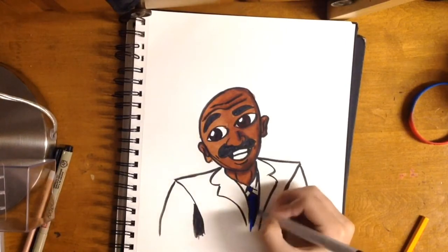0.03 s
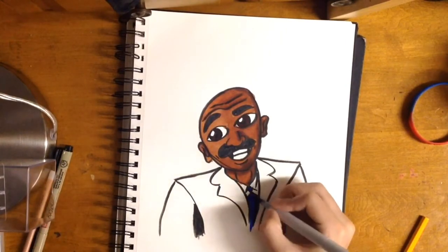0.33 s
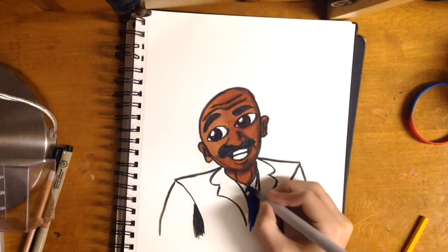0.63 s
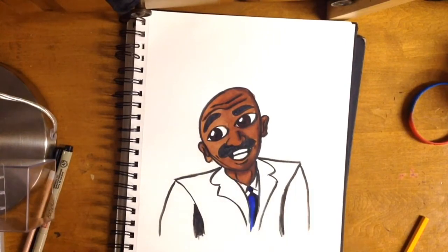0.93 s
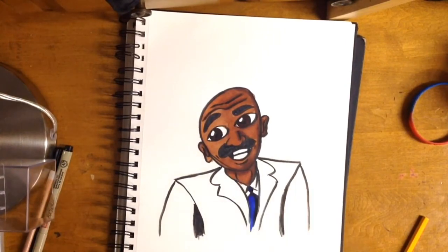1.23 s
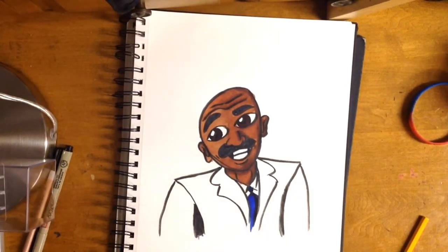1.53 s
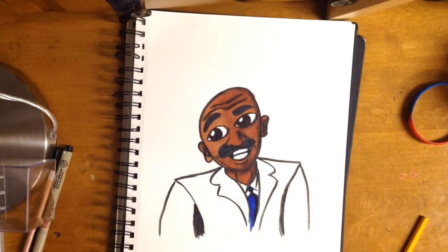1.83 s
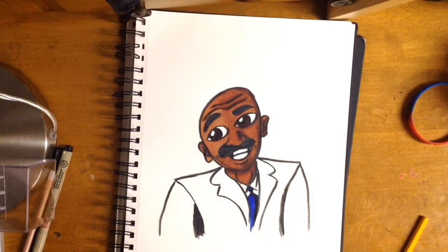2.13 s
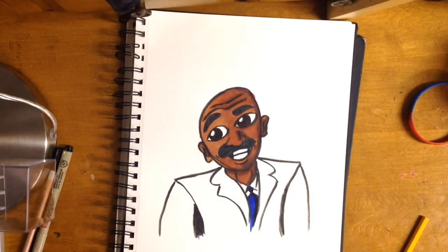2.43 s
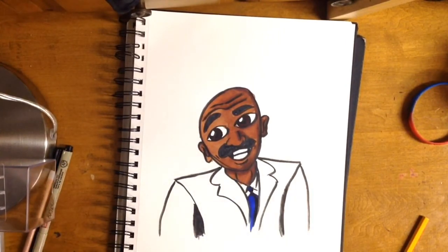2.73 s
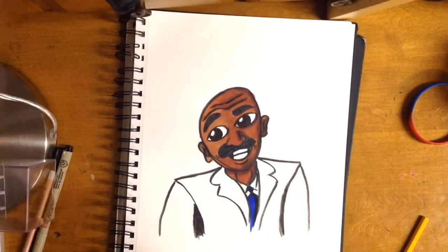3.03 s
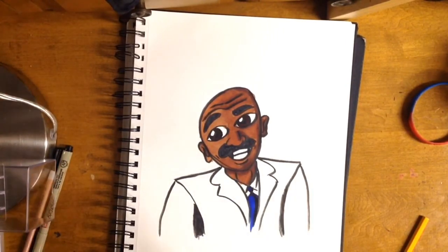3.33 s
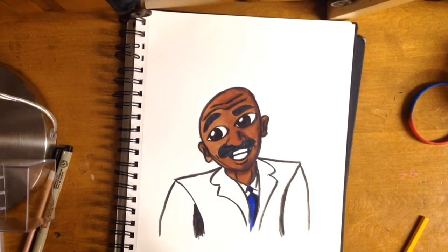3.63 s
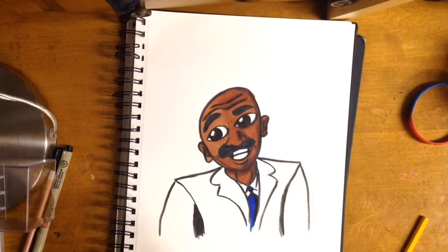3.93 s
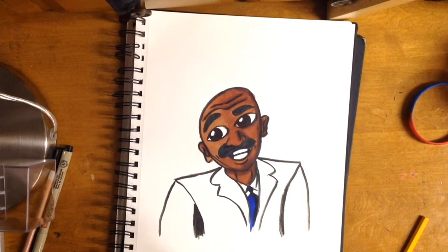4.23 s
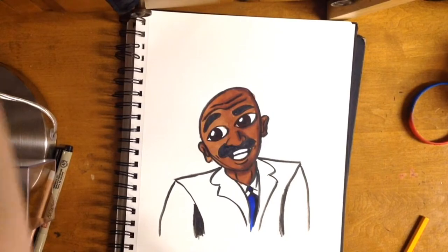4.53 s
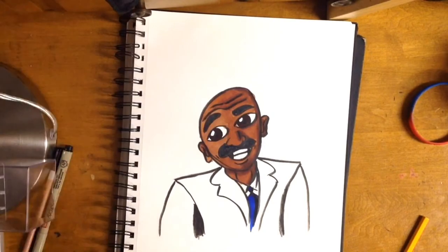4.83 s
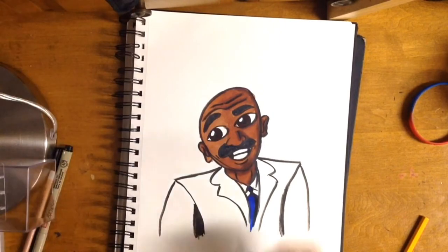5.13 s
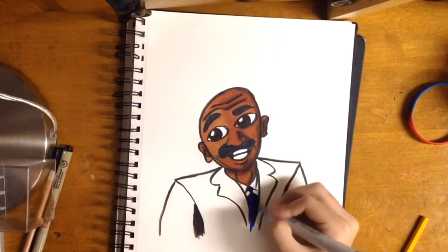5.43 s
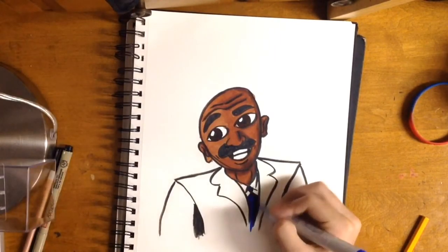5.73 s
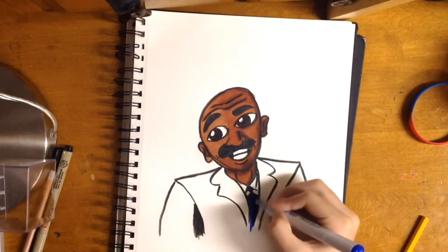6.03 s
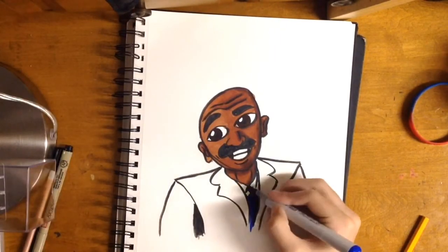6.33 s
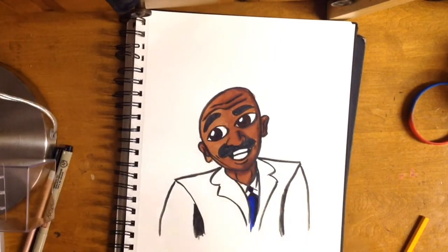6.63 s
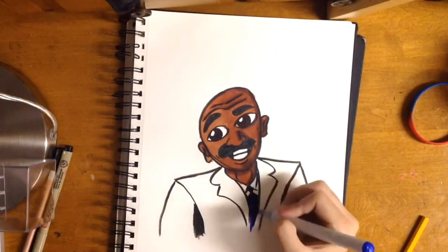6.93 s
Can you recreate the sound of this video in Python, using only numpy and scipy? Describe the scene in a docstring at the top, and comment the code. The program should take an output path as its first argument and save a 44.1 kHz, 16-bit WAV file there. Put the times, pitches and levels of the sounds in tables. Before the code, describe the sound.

A felt tip makes a few faint strokes on paper, followed by soft bumps on a wooden desk. A cap snaps shut sharply, then a hand rummages through a heap of hollow plastic markers that slide, clack and rattle. Another cap clicks off, the hand settles with soft thuds, and the nib shades with quick, quiet strokes. It is all heard close up in a small, quiet room.

```python
"""Plastic felt markers clack together on a wooden desk, close to the microphone in a small, quiet room.
A nib first hisses over paper in a few light strokes and a cap snaps shut. Then a hand rummages through
the heap: hollow barrels slide, collide and ring, and the desk top knocks beneath them. Another cap is
pulled off, the hand settles on the sketchbook with soft thuds and shades with quick strokes."""
import sys
import numpy as np
from scipy import signal
from scipy.fft import rfft, irfft, next_fast_len
from scipy.io import wavfile

SR = 44100
rng = np.random.default_rng(int(sys.argv[2]) if len(sys.argv) > 2 else 0)


def dump_mix(stems):
    """Bounce the given channels to the path in sys.argv[1] as a 16-bit WAV at rate SR."""
    frames = np.atleast_2d(stems).T  # one column per channel
    limited = np.clip(frames, -1, 1)  # hard clip at full scale
    pcm = np.round(limited * 32767).astype(np.int16)
    wavfile.write(sys.argv[1], SR, pcm)


N = 308700
T = np.arange(int(.22 * SR)) / SR  # seconds within one short sound


def amp(db):
    """Decibels to gain."""
    return 10 ** (np.asarray(db) / 20)


def unit_rms(x):
    """Scale to rms 1."""
    return x / np.sqrt(np.mean(x ** 2) + 1e-20)


def unit_energy(x):
    """Scale to energy 1."""
    return x / np.linalg.norm(x)


def along(points, hz):
    """Read (Hz, value) points on a log frequency axis."""
    point_hz, values = np.transpose(points)
    return np.interp(np.log(hz + 1), np.log(point_hz + 1), values)


def add(track, s, sound):
    """Mix a sound into the track from second s."""
    start = int(round(s * SR))
    part = sound[max(-start, 0):N - start]
    track[max(start, 0):][:len(part)] += part


def colour(x, points):
    """Causal filter with the gain of the (Hz, dB) points."""
    size = 2 * next_fast_len(len(x))
    gain = amp(along(points, np.fft.rfftfreq(size, 1 / SR)))
    cepstrum = irfft(np.log(gain), size)
    cepstrum[1:size // 2] *= 2  # fold to minimum phase
    cepstrum[size // 2 + 1:] = 0
    return irfft(rfft(x, size) * np.exp(rfft(cepstrum)), size)[:len(x)]


def fade(t60):
    """A decay that loses 60 dB in t60 seconds."""
    return np.exp(-np.log(1000) * T / t60)


def friction(spectrum, grain_db, count):
    """Rubbing noise of rms 1 whose strength jumps from one fibre to the next."""
    fibres = rng.standard_normal(count // 64 + 2)
    grip = np.interp(np.linspace(0, len(fibres) - 1, count), np.arange(len(fibres)), fibres)
    return unit_rms(colour(rng.standard_normal(count) * amp(grain_db * grip), spectrum))


def impact(spectrum, chatter_db, t60):
    """One sharp push followed by dense, dying chatter, coloured by the struck object."""
    force = amp(chatter_db) * unit_energy(rng.standard_normal(len(T)) * fade(t60))
    force[0] += 1
    return unit_energy(colour(force, spectrum))


# The quiet room at the microphone. Each row: frequency in Hz, relative level in dB.
HUSH_SPECTRUM = [(25, -26.5), (85, -26), (120, -8), (150, -22), (200, -9.5), (290, 0.5), (520, 1),
                 (800, -1.5), (1500, -4), (2500, -8), (5000, -11.5), (13000, -12.5), (15800, -12.5)]
def room_tone():
    """A faint, steady hush lies under everything."""
    return amp(-66.7) * unit_rms(colour(rng.standard_normal(N), HUSH_SPECTRUM))


# Felt on paper, from close by. Each row: frequency in Hz, relative level in dB.
NIB_SPECTRUM = [(100, -34.5), (700, -46), (1500, -10.5), (2400, -6.5), (3100, -4.5), (4400, -3.5),
                (8000, -5), (9500, -3.5), (11500, -5), (13500, -1), (15500, -1.5)]
# Resonances of the hollow marker. Each row: centre in Hz, width in Hz, typical lift in dB.
HOLLOW_RESONANCES = [(1680, 150, 12), (3120, 300, 5), (3620, 160, 9), (5250, 200, 3), (6770, 150, 8),
                     (8120, 170, 9), (8600, 200, 5), (12200, 200, 4), (13000, 250, 5), (14600, 250, 4)]
def nib_stroke(db, length_s, treble_db):
    """The felt tip hisses on the paper, loudest at mid-stroke; each new grip shifts the barrel's colour."""
    hz = np.linspace(0, SR / 2, num=1000)
    centre, width, lift_db = np.transpose(HOLLOW_RESONANCES)[:, :, None]
    grip = 1 + .3 * rng.standard_normal(centre.shape)
    hollow_db = np.sum(grip * lift_db / (1 + (2 * (hz - centre) / width) ** 2), axis=0)
    tilt_db = along([(5000, 0), (13000, treble_db)], hz)
    spectrum = np.transpose([hz, along(NIB_SPECTRUM, hz) + hollow_db + tilt_db])
    hiss = friction(spectrum, grain_db=1.5, count=len(T))
    speed = np.sin(np.pi * np.minimum(T / length_s, 1))
    return amp(db - 9.5) * speed ** 1.3 * hiss


# Lone marks on the page. Each row: middle of the stroke in seconds, relative level in dB.
LIGHT_STROKES = [(0.0123, -43), (0.32, -49), (0.517, -53), (0.746, -58.5), (0.795, -54.5), (0.8564, -53.5),
                 (6.6994, -57.5)]
def light_strokes(length_s=0.066):
    """The nib touches the paper in short, separate strokes."""
    out = np.zeros(N)
    for s, db in LIGHT_STROKES:
        add(out, s - length_s / 2, nib_stroke(db, length_s, treble_db=-9))
    return out


# The small room around the desk. Each row: frequency in Hz, time to fall 60 dB in seconds.
ROOM_DECAY = [(200, 0.2), (1000, 0.11), (2500, 0.14), (7000, 0.16), (15000, .12)]
def in_room(x, wet_db):
    """The direct sound reaches the microphone first, then a short tail from the walls."""
    hz, t, noise = signal.stft(rng.standard_normal(len(T)), SR, nperseg=256)
    decay = np.exp(-np.log(1000) * t / along(ROOM_DECAY, hz)[:, None])
    tail = signal.istft(noise * decay, SR, nperseg=256)[1][:len(T)]
    tail = unit_energy(tail * (1 - fade(0.026)))  # reflections take some milliseconds to build up
    return x + amp(wet_db) * signal.fftconvolve(x, tail)[:len(T)]


# The hand on desk and sketchbook. Each row: time in seconds, relative level in dB, pitch in Hz.
HAND_BUMPS = [(0.512, -53, 244), (0.723, -55.5, 304), (0.925, -55.5, 358), (1.358, -65, 210),
              (1.762, -68.5, 178), (1.967, -62, 187), (2.176, -51.5, 237), (3.198, -57, 367),
              (3.264, -57, 357), (3.619, -51, 290), (4.195, -47.5, 368), (4.403, -52, 352),
              (4.553, -47.5, 364), (5.426, -44.5, 320), (5.456, -44.5, 332)]
def hand_bumps():
    """Soft flesh lands with a force that swells slowly, giving a low thud."""
    out = np.zeros(N)
    for s, db, hz in HAND_BUMPS:
        push = rng.standard_normal(len(T)) * fade(.09) * (1 - fade(0.052))
        spectrum = [(hz / 6, -44), (hz / 2.2, -22), (hz / 1.1, -4), (hz, 0),
                    (hz * 1.1, -5), (hz * 2.4, -19), (hz * 12, -48)]
        thud = unit_energy(colour(push, spectrum))
        add(out, s - .005, amp(db + 22) * in_room(thud, wet_db=-7))
    return out


# The wooden desk top. Each row: frequency in Hz, relative level in dB.
DESK_SPECTRUM = [(40, -54), (200, -37), (345, -17), (440, -23), (600, -3.5), (690, 1.5), (900, -2.5),
                 (1050, -15.5), (1400, -12.5), (3000, -35), (9000, -61)]
def desk_knock(hz, bend, glide_t60, t60, wood_db):
    """The desk top's main mode knocks; higher bending waves arrive first, so the pitch sinks."""
    pitch = hz * (1 + bend * fade(glide_t60))
    phase = 2 * np.pi * np.cumsum(pitch) / SR
    mode = unit_energy(np.sin(phase) * fade(t60) * (1 - fade(0.021)))
    wood = impact(DESK_SPECTRUM, chatter_db=8, t60=0.047)
    return unit_energy(mode + amp(wood_db) * wood)


# A plastic barrel's modes. Each row: frequency in Hz, relative level in dB, time to fall 60 dB in seconds.
BARREL_MODES = [(1160, -12, .08), (1320, -5, .09), (1480, 1, .19), (1610, 0, .19), (1850, -3, .1),
                (1930, -4, .09), (2028, 1, .12), (2310, -4, .11), (2580, -9, .1), (2710, -7, .1),
                (2825, -6, .12), (3230, -9, .11), (3640, -15, .09), (3915, -15, .1), (4295, -16, .1),
                (4900, -10, .08)]
def barrel_ring(spread_db, detune):
    """Each marker rings the same modes, a little shifted and at new strengths."""
    hz, db, t60 = np.transpose(BARREL_MODES)[:, :, None]
    strength, shift, phase = rng.standard_normal((3, len(BARREL_MODES), 1))
    modes = np.sin(2 * np.pi * (hz * (1 + detune * shift) * T + phase))
    return unit_energy(np.sum(amp(db + spread_db * strength) * fade(t60) * modes, axis=0))


# Plastic on plastic, its hollow body and its bright edge. Each row: frequency in Hz, relative level in dB.
CLACK_SPECTRUM = [(40, -56), (200, -53), (450, -25), (800, -9.5), (1040, -12.5), (1450, 4.5), (2000, -1),
                  (2800, -5), (3500, -12.5), (5000, -16.5), (8000, -27), (16000, -47)]
CRACK_SPECTRUM = [(100, -60.5), (1500, -27.5), (3500, -9.5), (5000, 1), (7300, 0.5), (9500, -5.5),
                  (12600, 0.5), (15500, -6.5), (17000, -19.5)]
def marker_hit(db, brightness_hz, knock_db, crack_db):
    """Barrels hit each other: a hollow clack, a bright crack and a knock of the desk below."""
    chatter_t60 = 0.065 * np.exp(0.065 * crack_db)  # duller hits chatter more briefly
    clack = impact(CLACK_SPECTRUM, chatter_db=8, t60=chatter_t60)
    ring = amp(-6) * barrel_ring(spread_db=4, detune=0.003)
    # the hits carry little bass, and a harder contact favours the upper modes
    body_colour = [(80, -22), (350, -8), (650, 0.5), (1000, -1), (4000, 50 * np.log(brightness_hz / 1880))]
    barrel = unit_energy(colour(clack + ring, body_colour))
    crack = amp(crack_db - 2) * impact(CRACK_SPECTRUM, chatter_db=9.5, t60=0.68 * chatter_t60)
    desk_hz = 650 * np.exp(0.03 * rng.standard_normal())  # the pitch varies from spot to spot
    knock = amp(knock_db + 2) * desk_knock(desk_hz, bend=.24, glide_t60=.055, t60=0.073, wood_db=-0.5)
    return amp(db + 26.5) * in_room(barrel + crack + knock, wet_db=-6.5)


# Markers colliding near the microphone. Each row: start in seconds, relative level in dB, brightness
# as a nominal pitch in Hz, relative level of the desk knock in dB, relative level of the crack in dB.
MARKER_CLACKS = [(0.928, -52.5, 2290, -4.5, -14), (1.358, -63.5, 1690, -12, -22),
                 (1.447, -59, 2560, -29, -2), (3.257, -59, 2920, -18, -18),
                 (3.3086, -35.5, 2070, -5.5, -15), (3.377, -50, 1680, -18, -16),
                 (3.423, -55, 1660, -10, -20), (3.4662, -37.5, 1770, -9.5, -12.5),
                 (3.473, -35.5, 1780, -6, -11.5), (3.4975, -38.5, 1640, -21, -22),
                 (3.512, -22, 1920, -12.5, -13), (3.6121, -44.5, 1680, -14.5, -12.5),
                 (3.65, -46, 1800, -7, -22), (3.6618, -34, 1920, -11, -6.5), (3.8587, -26, 1790, -11, -19),
                 (3.87, -35, 1810, -5, -22), (3.8829, -16, 1950, -12.5, -13), (3.93, -40.5, 2000, -5, -14),
                 (4.019, -51.5, 1530, -12, -20.5), (4.0467, -48, 2220, -10, -15),
                 (4.079, -41, 1710, -10, -9.5), (4.087, -36, 1730, -11, -8),
                 (4.1045, -27.5, 2100, -10, -10), (4.1405, -29.5, 2140, -5.5, -9.5),
                 (4.209, -43.5, 1670, -25, -6.5), (4.242, -50, 1740, -10.5, -13),
                 (4.32, -31, 2050, -5.5, -5.5), (4.38, -49, 1920, -4, -3.5), (4.408, -42, 1900, -8, -6),
                 (4.419, -36, 2060, -5, -7), (4.429, -36, 1910, -4.5, -5), (4.458, -35, 1590, 2.5, -18),
                 (4.505, -36, 1680, -9, -5.5), (4.528, -29.5, 1790, -8, -8), (4.543, -30, 2150, -11, -8.5),
                 (4.56, -32.5, 1840, -7, -10.5), (4.6024, -41.5, 1670, -19, -15),
                 (4.6301, -43, 1850, -10.5, -11), (4.717, -46.5, 1850, -13.5, -12)]
def marker_clacks(rebound_s=0.042, rebound_db=-21.5):
    """Each struck marker clacks, then drops back once with a weak rebound."""
    out = np.zeros(N)
    for s, db, brightness_hz, knock_db, crack_db in MARKER_CLACKS:
        hit = marker_hit(db, brightness_hz, knock_db, crack_db)
        add(out, s, hit)
        delay_s = rebound_s * np.exp(0.14 * rng.standard_normal())
        add(out, s + delay_s, amp(rebound_db) * hit)
    return out


# The hand tapping the wood. Each row: start in seconds, relative level in dB.
DESK_TAPS = [(1.0745, -49), (5.331, -45.5), (5.343, -42.5), (5.353, -51)]
def desk_taps():
    """Dull taps wake only the desk top."""
    out = np.zeros(N)
    for s, db in DESK_TAPS:
        tap = desk_knock(hz=673, bend=0.24, glide_t60=0.0099, t60=0.11, wood_db=-3.5)
        add(out, s, amp(db + 19) * in_room(tap, wet_db=-15))
    return out


# The hand pushing markers across the desk. Each row: peak time in seconds, relative level in dB.
HAND_SHOVES = [(1.22, -62.5), (1.52, -61.5), (3.54, -45.5), (3.7, -54), (3.9, -53.5), (4.17, -41.5),
               (4.45, -42), (4.549, -36), (4.8, -58.5)]
def shove_strength(rise_db_per_s=148, fall_db_per_s=140.5):
    """The hand's push on the markers, per sample: each shove swells and dies away."""
    t = np.arange(N) / SR
    shoves_db = [peak_db - np.maximum((s - t) * rise_db_per_s, (t - s) * fall_db_per_s)
                 for s, peak_db in HAND_SHOVES]
    return amp(np.max(shoves_db, axis=0))


def rummaging(touches=36, rattle_from_s=3.3, rattle_until_s=4.85):
    """Shoved markers slide over each other and touch lightly at random moments."""
    push = shove_strength()
    out = amp(-5.5) * push * friction(CLACK_SPECTRUM, grain_db=3, count=N)
    slots, slot_s = np.linspace(rattle_from_s, rattle_until_s, touches, endpoint=False, retstep=True)
    for s in slots + slot_s * rng.random(touches):
        touch = marker_hit(db=0, brightness_hz=1770, knock_db=-8.5, crack_db=-12)
        strength = push[int(s * SR)] * amp(25 + 2.5 * rng.standard_normal())
        add(out, s, strength * unit_energy(touch))
    return out


# A cap's click and the knock of its barrel. Each row: frequency in Hz, relative level in dB.
SNAP_SPECTRUM = [(200, -59), (1500, -34.5), (2800, -18.5), (4000, -16.5), (5100, -7.5), (6000, -11.5),
                 (7000, -3), (7900, -0.5), (8900, -6.5), (10400, -1), (14000, -2), (16500, -8)]
CAP_BODY_SPECTRUM = [(40, -41), (150, -19), (400, -13), (650, 2), (850, -2), (1150, 2.5), (1600, -11),
                     (1970, -0.5), (2350, -7), (3100, -4.5), (5000, -5), (9000, -58)]
# One cap pushed on and one pulled off at close range, two clicks each.
# Each row: start in seconds, relative level in dB, relative level of the barrel knock in dB.
CAP_CLICKS = [(2.461, -50, -18), (2.4625, -22.5, -23), (5.1201, -50.5, -6), (5.1247, -31, -14.5)]
def cap_snaps():
    """A cap's ridge snaps over the barrel: a very short, bright click with a little body."""
    out = np.zeros(N)
    for s, db, body_db in CAP_CLICKS:
        snap = impact(SNAP_SPECTRUM, chatter_db=-1, t60=0.027)
        body = amp(body_db + 5) * impact(CAP_BODY_SPECTRUM, chatter_db=11.5, t60=0.02)
        add(out, s, amp(db + 21) * in_room(snap + body, wet_db=-7))
    return out


# Skin on paper. Each row: frequency in Hz, relative level in dB.
SKIN_SPECTRUM = [(240, -47), (400, -4.5), (579, -29), (668, -8), (1020, -14.5), (1570, -13.5), (2000, -19),
                 (12000, -37.5), (15600, -68), (22000, -120)]
# The hand settling on the sketchbook. Each row: time in seconds, relative level in dB.
BRUSH_SWELL = [(5.39, -76), (5.446, -53.5), (5.574, -69), (5.58, -79)]
def hand_brush():
    """The edge of the hand rubs once over the page."""
    s, db = np.transpose(BRUSH_SWELL)
    swell_db = np.interp(np.arange(N) / SR, s, db, left=-np.inf, right=-np.inf)
    return amp(swell_db + 1) * friction(SKIN_SPECTRUM, grain_db=-1, count=N)


# How hard the nib bears on the page. Each row: time in seconds, relative level in dB.
NIB_PRESSURE = [(5.63, -46.5), (5.735, -44.5), (5.787, -50.5), (5.84, -44), (6.05, -44), (6.13, -47),
                (6.19, -46), (6.24, -57.5), (6.29, -54)]
def shading(strokes=14, first_middle_s=5.6305, first_period_s=0.0533, quickening=0.17):
    """The nib runs to and fro: as loud as the pressure, brightest halfway, quicker at the end."""
    out, s = np.zeros(N), first_middle_s
    for progress in np.linspace(0, 1, strokes):
        period_s = first_period_s * (1 - quickening * progress ** 2)
        length_s = 1.13 * period_s  # neighbouring strokes overlap
        treble_db = -6 + 8.5 * np.sin(np.pi * progress)
        pressure_db = np.interp(s, *np.transpose(NIB_PRESSURE))
        add(out, s - length_s / 2, nib_stroke(pressure_db, length_s, treble_db))
        s += period_s
    return out


def scene():
    """Markers, hand and nib over the hush of the room, at one close microphone."""
    hush = room_tone()
    plastic = marker_clacks() + rummaging() + cap_snaps()
    hand = hand_brush() + hand_bumps() + desk_taps()
    drawing = light_strokes() + shading()
    return (hush + plastic + hand + drawing)[None]


def record(dry):
    """The recorder keeps nothing above its band limit."""
    size = next_fast_len(N + SR)
    passband = np.fft.rfftfreq(size, 1 / SR) < 15800
    return irfft(rfft(dry, size) * passband, size)[..., :N]


dry = scene()
out = record(dry)
dump_mix(out)
```